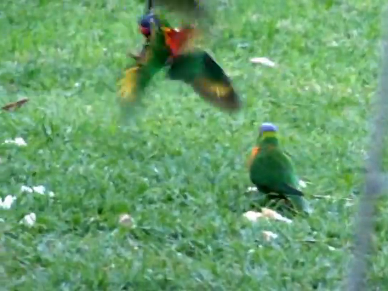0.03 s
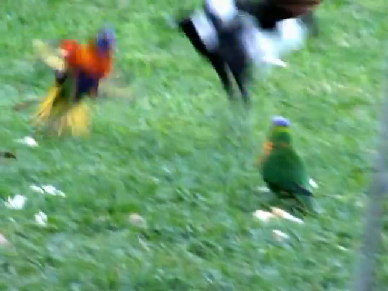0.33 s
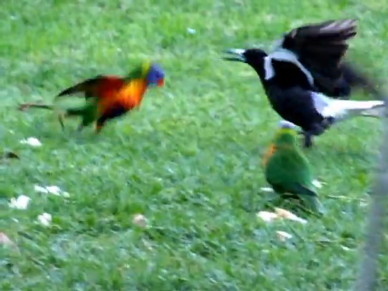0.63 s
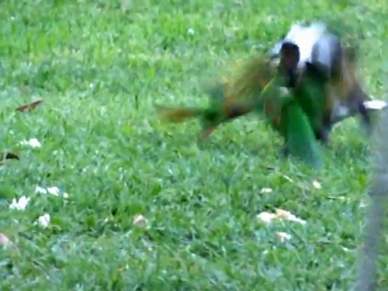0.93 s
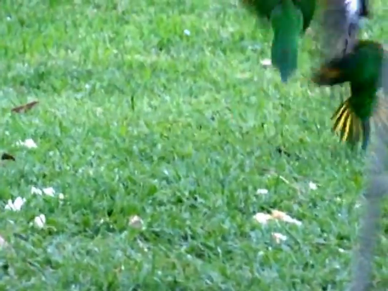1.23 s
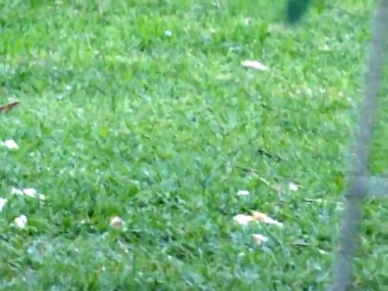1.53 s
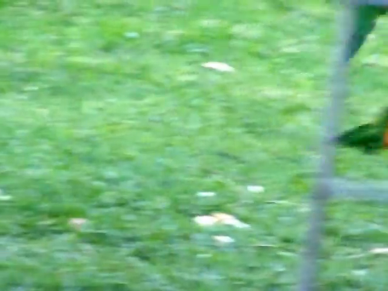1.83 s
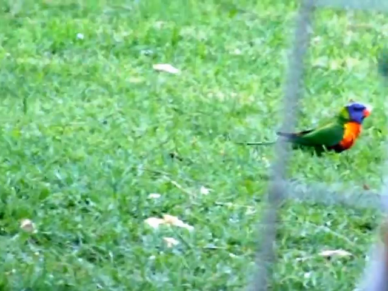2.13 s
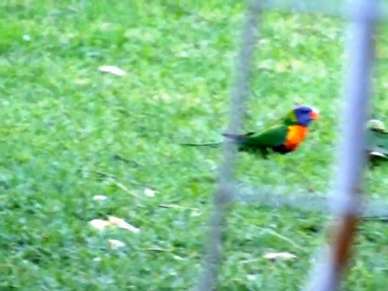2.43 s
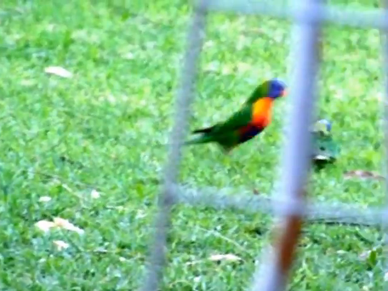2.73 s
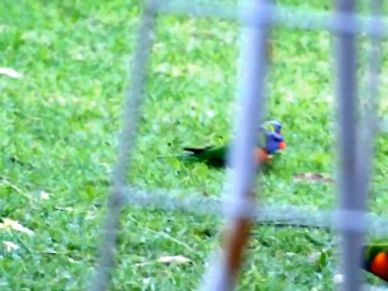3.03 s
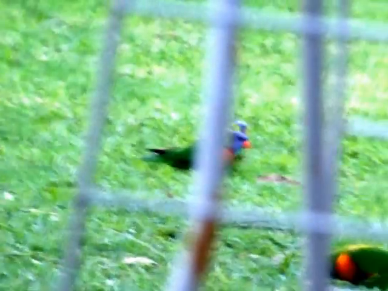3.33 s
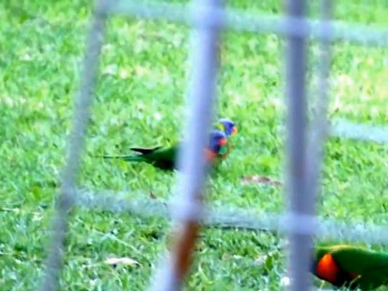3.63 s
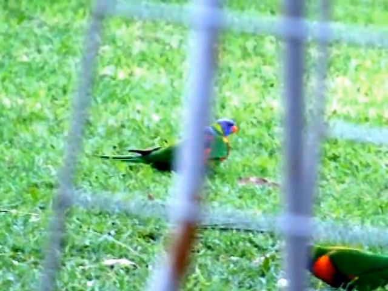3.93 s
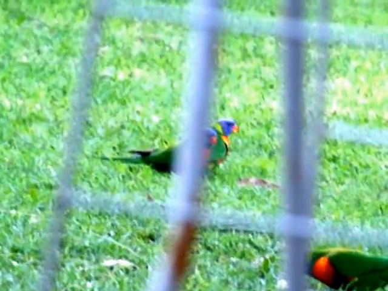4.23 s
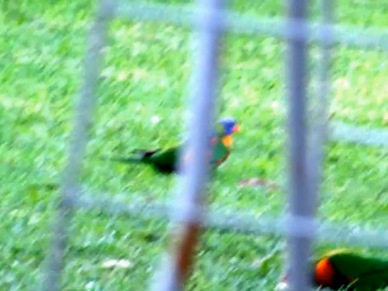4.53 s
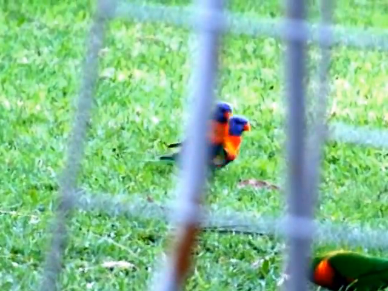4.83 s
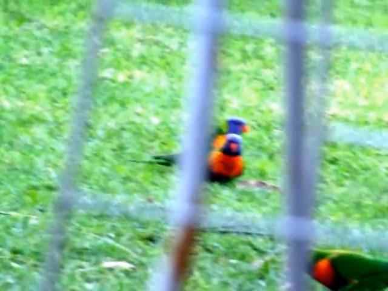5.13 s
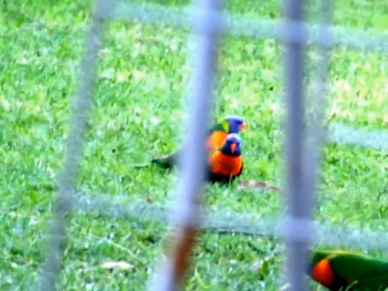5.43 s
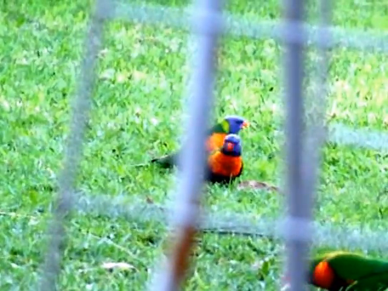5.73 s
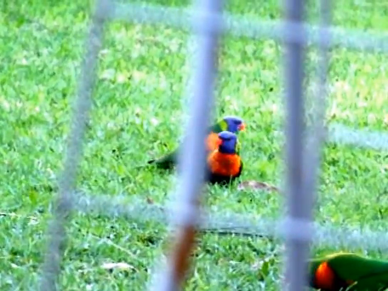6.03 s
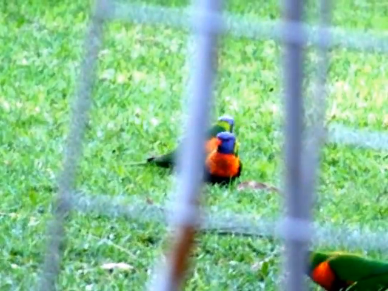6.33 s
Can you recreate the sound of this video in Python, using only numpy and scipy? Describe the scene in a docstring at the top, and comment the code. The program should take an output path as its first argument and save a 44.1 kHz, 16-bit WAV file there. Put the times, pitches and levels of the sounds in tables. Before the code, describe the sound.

Lorikeets scuffle with a magpie on a lawn. A rough call and scattered chirps lead into four harsh, rattling screeches, followed by quick chatter and hissing. The birds then trade hoarse swooping calls and clearer gliding whines, which weaken and end with a couple of faint beak snaps. Nearby walls add a slight echo, and quiet outdoor air runs underneath, with a low hum that fades away.

```python
"""Lorikeets scuffle with a magpie on a lawn, over outdoor air and a low hum that dies away.
A rough swoop and scattered chirps open; from 1.1 s the lorikeets screech four times, each a whistle
breaking into a rattle, then chatter and hiss. From 2.6 s to 5 s the birds' vibrating throat membranes
trade rough swoops and clear whines. Two last beak snaps and a faint far-off hoot close the scene.
Throughout, feet tick in the grass and nearby walls echo the calls."""
import sys
import numpy as np
from scipy import signal
from scipy.fft import rfft, irfft, next_fast_len
from scipy.io import wavfile

SR = 44100
rng = np.random.default_rng(int(sys.argv[2]) if len(sys.argv) > 2 else 0)


def to_wav(sig):
    """Store sig (one row per channel, or 1-D mono) as 16-bit WAV at the path in sys.argv[1].

    Samples outside -1..1 are clipped; the rate is SR.
    """
    pcm = np.clip(np.atleast_2d(sig), -1, 1) * 32767
    pcm = np.round(pcm).astype(np.int16)
    wavfile.write(sys.argv[1], SR, pcm.T)  # frames by channels


N = 281799
T = np.arange(N) / SR

# screech cues: start t/s, break-up t/s, end t/s, whistle f/Hz, beak resonance f/Hz, relative level/dB
SCREECH_CUES = [(1.092, 1.12, 1.35, 1847, 4750, -16.5), (1.344, 1.381, 1.508, 1912, 4230, -16),
                (1.625, 1.665, 1.905, 1961, 4020, -16), (1.909, 1.951, 2.19, 1942, 4160, -18.5)]
# screech EQ: f/Hz, gain/dB
SCREECH_EQ = [(410, -93), (700, -70), (1090, -7.5), (1190, -21), (1560, -17), (1930, -25.5), (2180, -15.5),
              (2700, -10), (3390, 0), (4060, -7), (4590, -0.5), (5690, -1.5), (7970, -9), (9440, -18),
              (10300, -13.5), (13400, -82), (22000, -120)]
# lorikeet chirps: t/s, length/s, start f/Hz, end f/Hz, level/dB, overtones/dB, roughness/0-1
CHIRP_CUES = [(0.105, .048, 1946, 2954, -32.5, -28, 0.75), (0.388, 0.07, 2920, 2960, -47.5, -1, .8),
              (.42, 0.048, 4120, 4130, -37.5, -28, 0.27), (.512, 0.067, 3350, 2270, -43, -26, 0.8),
              (.661, 0.1, 3010, 3165, -47.5, 4, 0.33), (.809, 0.053, 2790, 2140, -37, -22, 0.3),
              (0.993, 0.097, 2477, 1538, -31.5, -25, 0.33), (1.19, 0.054, 1900, 1320, -41, -19, 0.3),
              (1.287, 0.1, 2373, 2260, -34.5, -1, .35), (1.417, 0.052, 1822, 1328, -37, -5, 0.33),
              (1.523, 0.078, 2950, 2077, -36, 6, 0.17), (2.126, 0.081, 2193, 2176, -37, 5, 0.6),
              (2.206, 0.078, 2587, 2153, -32, -6.5, 0.25), (2.291, 0.091, 2060, 1984, -35.5, -3, 0.74),
              (2.294, 0.034, 6330, 5830, -29.5, -20, 0), (2.343, 0.041, 6500, 5150, -28, -27, 0.06),
              (2.377, 0.077, 2627, 2495, -31, 2, 0.88), (2.379, .07, 4990, 4850, -28, -23, 0),
              (2.46, 0.05, 2335, 2067, -33.5, 3, .15), (2.506, 0.047, 2403, 2690, -30.5, 1.5, 0.3),
              (2.508, .028, 8700, 7970, -31, -16, .05), (2.545, 0.034, 2170, 2320, -37.5, 8, .2),
              (2.581, 0.055, 2720, 2620, -28, 5, 0.2), (2.637, .07, 2292, 2167, -34.5, 6, 0.54),
              (2.866, 0.018, 1795, 1554, -25.5, -32, 0.2), (2.997, .07, 1903, 2286, -44.5, 5, 0.5),
              (3.603, 0.069, 1950, 2350, -50, 13.5, 0.26), (4.168, 0.023, 1674, 1903, -21.5, -28, 0.37),
              (4.206, 0.065, 1757, 1738, -26.5, -27, 0.62)]
# beak colour on the overtones: f/Hz, gain/dB
BEAK_EQ = [(1500, -9), (3000, 2.5), (5000, -1.5), (6500, -1), (8000, -7), (10000, -30)]
# runs of faint chirps: start t/s, end t/s, f/Hz, level/dB, overtones/dB
CHATTER_RUNS = [(3.309, 3.48, 6560, -42.5, -20), (4.302, 4.58, 2180, -48.5, 0)]
# hisses: t/s, length/s, centre f/Hz, width/Hz, level/dB
HISS_CUES = [(0.373, 0.098, 5630, 880, -43), (0.796, 0.073, 6250, 1780, -34.5),
             (2.116, 0.66, 4960, 3350, -34), (2.613, 0.059, 5400, 3040, -24.5),
             (2.924, 0.014, 6230, 1000, -37), (3.036, 0.17, 4500, 4020, -39),
             (3.793, 0.035, 6680, 2000, -26), (3.902, 0.078, 4560, 1200, -28),
             (3.978, 0.086, 4680, 604, -25), (3.929, 0.15, 6170, 1540, -27.5),
             (4.158, 0.43, 5340, 3450, -52)]
# swooping calls: t/s, length/s, start f/Hz, middle f/Hz, end f/Hz, level/dB, overtones/dB, roughness/0-1
SWOOP_CUES = [(0, 0.11, 609.5, 672, 694, -24.5, -1.5, 0.54), (2.585, 0.16, 1042, 927.5, 625, -23, 3, 0.74),
              (2.754, 0.13, 818.4, 864.7, 837, -25.5, -22, 0),
              (2.98, 0.35, 620.4, 775.6, 864.6, -22.5, 0, 0.54), (3.053, 0.1, 821, 892, 803, -24, -4, 0.8),
              (3.482, 0.14, 957, 795, 742, -27.5, 0, 0.76),
              (3.607, 0.23, 629.4, 853, 821, -21.5, 0.5, 0.61),
              (3.848, 0.24, 680, 928.6, 975, -24, -4, 0.7), (3.985, .175, 648, 636, 589, -32.5, -6, 0.7),
              (4.162, 0.21, 591.5, 644.4, 723, -27, -1, .4), (4.317, .13, 809, 913.6, 947, -28.5, -14, 0.5),
              (4.66, 0.11, 588, 689, 686, -34, 3, 0.57), (4.829, 0.082, 593, 710, 762, -37, 12, 0.78)]
# throat colour of the swoops, beside the tuned harmonic: f/Hz, gain/dB
SWOOP_THROAT = [(500, -22), (900, -21), (1900, -20), (2400, -34), (3400, -36), (4000, -22), (4600, -22),
                (5400, -32), (6500, -27), (7600, -26), (10000, -38)]
# whines: t/s, length/s, start f/Hz, middle f/Hz, end f/Hz, level/dB, swell/dB, overtones/dB,
# odd harmonics/dB, roughness/0-1, vibrato/share of pitch
WHINE_CUES = [(0, 0.083, 974, 953, 930, -37.5, -15, 14, -5, 0.83, 0),
              (0.713, 0.26, 927, 957, 949, -42, 2, 11, 3, .48, 0.005),
              (3.135, 0.32, 1055, 1134, 1217, -19.5, 6, -9.5, 0.5, 0.16, .014),
              (3.488, 0.12, 1161, 1240, 1311, -24.5, -27, -7, 2.5, 0.15, 0),
              (3.85, .305, 1059, 880, 800, -20.5, -6.5, -6, 0.5, 0.02, 0.0014),
              (4.716, .29, 877.5, 805.7, 717, -33.5, -7.5, 7, -16, 0.28, 0.00047)]
# throat colour of the whines, beside the tuned harmonic: f/Hz, gain/dB
WHINE_THROAT = [(500, -23), (1150, -26), (2000, -20), (2550, -25), (2900, -18), (3350, -22), (3750, -24),
                (4200, -22), (4800, -15), (5500, -20), (6400, -18), (7500, -29), (10000, -42)]
# beak snaps: t/s, relative level/dB, tip resonance f/Hz
SNAP_CUES = [(0.1737, -26, 7060), (0.525, -27.5, 5600), (.8875, -26.5, 7500), (1.089, -19, 3760),
             (3.497, -16, 7340), (4.9782, -25.5, 6140), (5.117, -33.5, 3940)]
# wall echoes: delay t/s, level/dB
WALL_ECHOES = [(0.019, -7), (0.043, -12.5), (0.079, -17.5), (0.12, -17)]
# outdoor air EQ: f/Hz, gain/dB
AIR_EQ = [(15, -21.5), (25, -10), (55, 4.5), (90, -4.5), (120, -5.5), (150, -2), (319, -10.5), (442, -10.5),
          (584, -8.5), (991, -7.5), (1810, -10), (3080, -13), (4380, -15), (6900, -12), (8440, -20),
          (10300, -36), (13400, -99), (22000, -120)]
# fader ride on the air: t/s, level/dB
AIR_RIDE = [(0, -41), (.6, -41), (2.5, -45), (4.6, -44), (5.5, -46), (5.7, -44), (6.4, -45)]
# hum partials: f/Hz, relative level/dB
HUM_PARTIALS = [(48.4, -41.5), (145.3, -70.5), (236, -62)]
# fader ride on the hum: t/s, gain/dB
HUM_RIDE = [(0, -8), (.4, 2), (2, -0.5), (2.3, -6), (2.6, -8), (6.4, -29.5)]
# soft handling thump: t/s, length/s, f/Hz, level/dB
THUMP_CUE = (3.2, .09, 42, -38)
# far-off hoot: t/s, length/s, f/Hz, level/dB
HOOT_CUE = (5.83, .24, 445, -57)

TOP_HZ = 9800


def screeches(trim_db=-3, scoop=.18, chaos_hz=2400, rattle=.23, rattle_hz=600):
    """A scooped whistle breaks into chaotic, rattling vibration and rings the open beak."""
    out = np.zeros(N)
    for start, burst, end, pitch, beak_hz, db in SCREECH_CUES:
        t = span(start, end)
        lead_in = np.clip((t - start) / (burst - start), 0, 1)
        rough = np.clip((t - burst) / .018 + .3, 0, 1)
        hz = pitch * (1 + scoop * (1 - rough) * (2 * lead_in - .8) ** 2 + .045 * rough)
        shake = .012 * wobble(t, chaos_hz) + rough * (.05 * wobble(t, chaos_hz) + .055 * wobble(t, 170))
        tone = syrinx(hz, shake, [(2000, 9), (6000, 2.5), (10000, -2.5)], -21 * (1 - rough), 0, order=2)
        whistle = unit(colour(tone, SCREECH_EQ)) * undb(4 * (.5 - rough))
        # under full pressure the other side of the syrinx joins in at an unrelated pitch
        other_shake = .0342 * wobble(t, chaos_hz) + .051 * wobble(t, 200)
        other_side = syrinx(hz * 1.33, other_shake, BEAK_EQ, 0, 0, order=1)
        clash = unit(colour(other_side, SCREECH_EQ)) * undb(-4.5)
        breath = unit(colour(rng.standard_normal(len(t)), SCREECH_EQ)) * undb(-8.5)
        ring = beak_ring(len(t), beak_hz) * undb(-3.5)
        bite = band(len(t), 2600, 450) * undb(-14)
        voice = whistle + rough * (breath + clash + ring + bite)
        depth = rattle * rough
        slaps = np.exp(depth * np.minimum(wobble(t, rattle_hz), 1.5) - depth ** 2)
        add(out, t, voice * slaps * undb(db + screech_force(t, burst)) * fade(t, .0031))
    return out * undb(trim_db)


def screech_force(t, burst, lead_s=.017, hold_s=.073, rise_db_per_s=607, fall_db_per_s=95.5):
    """Envelope in dB: the force is full just before the break-up, holds, then drains away."""
    early = np.maximum(burst - lead_s - t, 0)
    late = np.maximum(t - burst - hold_s, 0)
    return -rise_db_per_s * early - fall_db_per_s * late


def beak_ring(count, hz, width_hz=400, puffs_per_s=380):
    """Irregular puffs of uneven strength ring one beak resonance, rms 1."""
    puffs = (rng.random(count) < puffs_per_s / SR) * (1 + rng.random(count))
    return unit(signal.lfilter(*signal.iirpeak(hz, hz / width_hz, fs=SR), puffs))


def syrinx(hz, shake, throat, overtones_db, odd_db, order):
    """Harmonics of a shaking membrane; the throat is tuned to the harmonic of the given order."""
    phase = 2 * np.pi * np.cumsum(hz * (1 + shake)) / SR
    out = np.sin(order * phase)
    for k in range(1, int(TOP_HZ / hz.min()) + 1):
        if k != order:
            gain = response(k * hz, throat) * undb(overtones_db * (k > order) + odd_db * (k % 2))
            out += gain * np.sin(k * phase) * (k * hz < SR / 3)
    return np.sqrt(2) * out


def swoops(detune=.068, attack_s=.016, release_s=.028, arch_db=2):
    """Rough swooping calls: the two sides of the syrinx run slightly apart and beat."""
    out = np.zeros(N)
    for start, length, first_hz, middle_hz, last_hz, db, overtones_db, rough in SWOOP_CUES:
        t = span(start, start + length)
        hz = glide(t, first_hz, middle_hz, last_hz) * (1 + .0176 * wobble(t, 45))
        lead = syrinx(hz, .03 * rough * wobble(t, 300), SWOOP_THROAT, overtones_db, odd_db=-3, order=2)
        # the slack side is duller and wanders more
        wander = .0525 * wobble(t, 200)
        slack = syrinx(hz * (1 - detune), wander, SWOOP_THROAT, overtones_db - 8.5, odd_db=-3, order=2)
        tone = lead + undb(-3) * rough * slack
        flutter = 1 + .5 * rough * wobble(t, 110)
        edges = np.clip(np.minimum((t - t[0]) / attack_s, (t[-1] - t) / release_s), 0, 1)
        force = undb(db - arch_db * np.linspace(-1, 1, len(t)) ** 2) * edges
        add(out, t, tone * force * flutter)
    return out


def whines(jitter_hz=450, vibrato_hz=5.8):
    """Long glides from a steadier membrane, from nearly pure to hoarse."""
    out = np.zeros(N)
    for start, length, *pitches, db, swell_db, overtones_db, odd_db, rough, vibrato in WHINE_CUES:
        t = span(start, start + length)
        hz = glide(t, *pitches) * (1 + vibrato * np.sin(2 * np.pi * vibrato_hz * (t - start)))
        shake = .035 * rough * wobble(t, jitter_hz)
        tone = syrinx(hz, shake, WHINE_THROAT, overtones_db, odd_db, order=2)
        force = undb(db + swell_db * np.linspace(-.5, .5, len(t)))
        tremor = 1 + (.05 + .45 * rough) * wobble(t, 80)
        add(out, t, tone * force * tremor * fade(t, .018))
    return out


def chirps(jitter_hz=1100, sag=.01):
    """Short slurred lorikeet notes that crack as the membrane shakes."""
    out = np.zeros(N)
    for start, length, first_hz, last_hz, db, overtones_db, rough in CHIRP_CUES + chatter():
        t = span(start, start + length)
        hz = glide(t, first_hz, np.sqrt(first_hz * last_hz) * (1 - sag), last_hz)
        shake = .06 * rough * (wobble(t, jitter_hz) + wobble(t, 140))
        tone = syrinx(hz, shake, BEAK_EQ, overtones_db, 0, order=1)
        flutter = 1 + .31 * wobble(t, 200)
        add(out, t, tone * undb(db) * flutter * fade(t, .0056))
    return out


def chatter(step_s=.055, note_s=.03, fall=.06, rough=.15, pitch_spread=.063, spread_db=7):
    """Chirp cues for runs of faint falling notes, loosely timed."""
    cues = []
    for start, end, pitch, db, overtones_db in CHATTER_RUNS:
        for beat in np.arange(start, end, step_s):
            late, sharp, loud = rng.standard_normal(3)
            onset = beat + late * step_s / 10
            hz = pitch * (1 + pitch_spread * sharp)
            note_db = db + spread_db * loud
            cues.append((onset, note_s, hz * (1 + fall), hz * (1 - fall), note_db, overtones_db, rough))
    return cues


def hisses(flutter_hz=190, depth=.15):
    """Air forced through a narrow throat, roughened by a loose flutter."""
    out = np.zeros(N)
    for start, length, hz, width_hz, db in HISS_CUES:
        t = span(start, start + length)
        phase = 2 * np.pi * np.cumsum(flutter_hz * (1 + .078 * wobble(t, 91))) / SR
        flutter = 1 + depth * np.sin(phase)
        add(out, t, band(len(t), hz, width_hz) * flutter * undb(db) * fade(t, length / 4))
    return out


def snaps(decay_s=.0038, trim_db=-5, jaw_hz=2800, jaw_db=-11):
    """Beaks clap shut: a bright tick from the tip and a duller knock from the jaw."""
    out = np.zeros(N)
    for start, db, tip_hz in SNAP_CUES:
        t = span(start, start + .019)
        tip = band(len(t), tip_hz, 2400)
        jaw = band(len(t), jaw_hz, 2300) * undb(jaw_db)
        add(out, t, (tip + jaw) * np.exp(-(t - t[0]) / decay_s) * undb(db + trim_db))
    return out


def grass(ticks_per_s=6.4, db=-45.5, spread_db=7, decay_s=.0027):
    """Faint scattered ticks as the birds step and peck in the grass."""
    out = np.zeros(N)
    for start in rng.uniform(0, T[-1] - .02, int(ticks_per_s * T[-1])):
        t = span(start, start + .012)
        tick = band(len(t), hz=4200, width_hz=4000) * np.exp(-(t - t[0]) / decay_s)
        add(out, t, tick * undb(db + spread_db * rng.standard_normal()))
    return out


def yard(x, t60_s=1.0, tail_db=-12, smear_s=.0025):
    """Direct sound, a few slightly smeared wall echoes and a thin diffuse tail."""
    t = span(0, .95)
    tail = rng.standard_normal(len(t)) * undb(-60 * t / t60_s) * np.minimum(t / .01, 1)
    impulse = tail / np.linalg.norm(tail) * undb(tail_db)
    impulse[0] += 1
    for delay, db in WALL_ECHOES:
        scatter = rng.standard_normal(len(t)) * np.exp(-np.abs(t - delay) / smear_s)
        impulse += scatter / np.linalg.norm(scatter) * undb(db)
    return signal.fftconvolve(x, impulse)[:N]


def outdoor_air():
    """A quiet, wide-band wash whose level flickers slightly."""
    wash = unit(colour(rng.standard_normal(N), AIR_EQ))
    return wash * undb(ride(AIR_RIDE) + wobble(T, 16))


def hum():
    """Three low partials drift together in pitch and die away."""
    drifting_time = np.cumsum(1 + .0026 * wobble(T, 3.4)) / SR
    tone = sum(undb(db + .6 * wobble(T, 6.3)) * np.sin(2 * np.pi * hz * drifting_time)
               for hz, db in HUM_PARTIALS)
    return np.sqrt(2) * tone * undb(ride(HUM_RIDE))


def swell(start, length, hz, db):
    """A soft sine that rises and dies: the thump or the hoot."""
    out, t = np.zeros(N), span(start, start + length)
    add(out, t, np.sqrt(2) * np.sin(2 * np.pi * hz * (t - t[0])) * undb(db) * fade(t, length / 2))
    return out


def undb(db):
    """Decibels to gain."""
    return 10 ** (np.asarray(db) / 20)


def unit(x):
    """Scale to rms 1."""
    return x / (x.std() + 1e-12)


def response(hz, eq):
    """Gain of an EQ curve at the given frequencies."""
    f, db = np.transpose(eq)
    return undb(np.interp(np.log(np.maximum(hz, 1)), np.log(f), db))


def colour(x, eq):
    """Filter by an EQ curve: f/Hz, gain/dB."""
    size = next_fast_len(len(x) + 512)
    return irfft(rfft(x, size) * response(np.fft.rfftfreq(size, 1 / SR), eq), size)[:len(x)]


def band(count, hz, width_hz):
    """Noise in one resonance, rms 1."""
    f = np.fft.rfftfreq(count, 1 / SR) + 1
    off_centre = (f * f - hz * hz) / (f * width_hz)
    return unit(irfft(rfft(rng.standard_normal(count)) / (1 + off_centre ** 2), count))


def wobble(t, rate_hz):
    """Random modulator: values joined by lines, spread near 1."""
    position = (t - t[0]) * rate_hz
    points = rng.standard_normal(int(position[-1]) + 2)
    return np.sqrt(3 / 2) * np.interp(position, np.arange(len(points)), points)


def glide(t, first_hz, middle_hz, last_hz):
    """Pitch bend: one smooth arc from start through middle to end."""
    arc = np.polyfit([0, .5, 1], [first_hz, middle_hz, last_hz], 2)
    return np.polyval(arc, np.linspace(0, 1, len(t)))


def ride(points):
    """A fader ride in dB across the scene."""
    return np.interp(T, *np.transpose(points))


def span(start, end):
    """Sample times between two moments."""
    return T[max(int(start * SR), 0):int(end * SR)]


def fade(t, edge_s):
    """Soft fade in and out."""
    return np.sin(np.pi / 2 * np.clip(np.minimum(t - t[0], t[-1] - t) / edge_s, 0, 1)) ** 2


def add(out, t, x):
    """Mix x into out at the times t."""
    first = int(round(t[0] * SR))
    out[first:first + len(x)] += x


def scene():
    """Mono mix: the birds through the yard's echoes, over the background bed and dry grass ticks."""
    birds = yard(swoops() + whines() + screeches() + chirps() + hisses() + snaps())
    bed = outdoor_air() + hum() + swell(*THUMP_CUE) + swell(*HOOT_CUE)
    return (birds + bed + grass())[None]


def record(dry, headroom=.9):
    """Master chain: round the loudest peaks, thin the lowest bass and cut the top steeply."""
    rounded = headroom * np.tanh(dry[0] / headroom)
    shaped = colour(rounded, [(35, -4.5), (60, -.5), (100, 2), (8200, 1), (9300, -5.5), (10000, -15)])
    high_cut = signal.ellip(8, .2, 80, TOP_HZ, fs=SR, output="sos")
    return signal.sosfilt(high_cut, shaped)[None]


dry = scene()
out = record(dry)
to_wav(out)
```